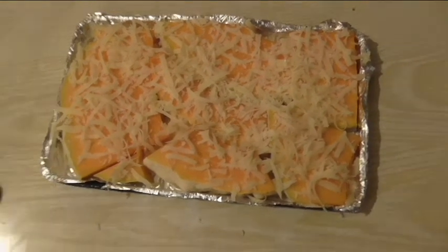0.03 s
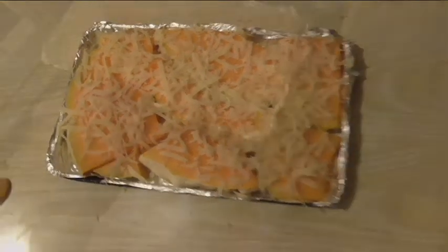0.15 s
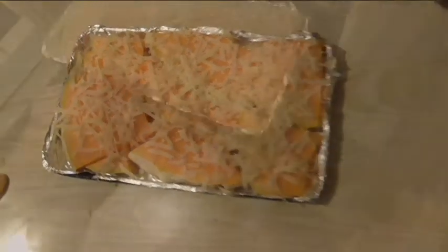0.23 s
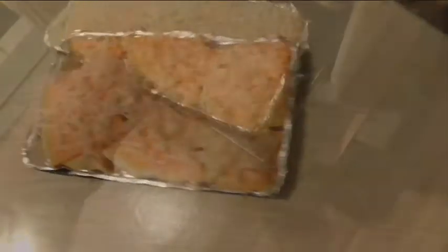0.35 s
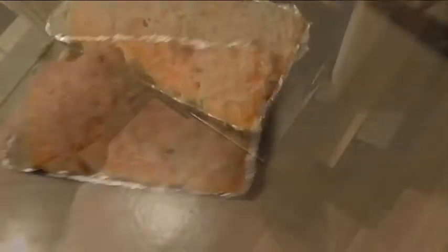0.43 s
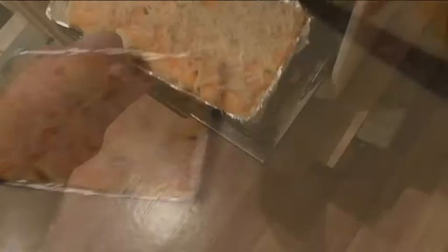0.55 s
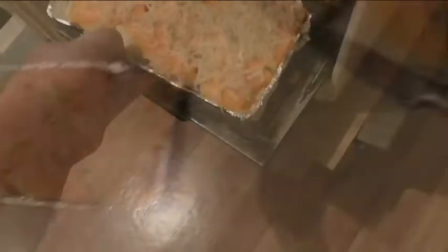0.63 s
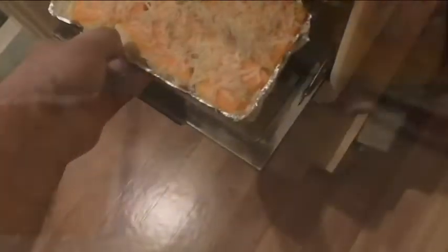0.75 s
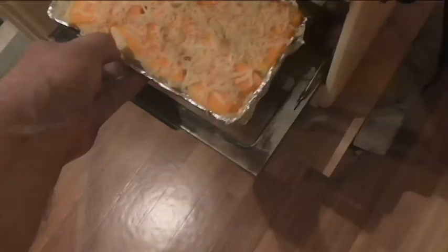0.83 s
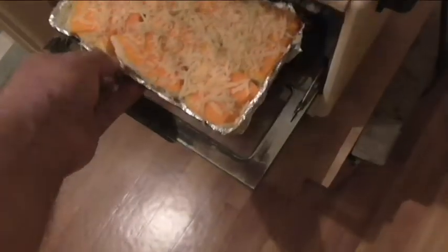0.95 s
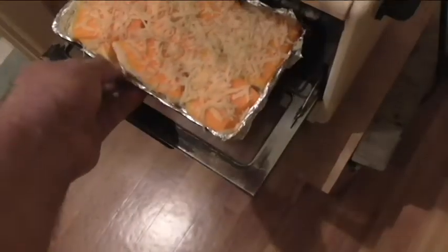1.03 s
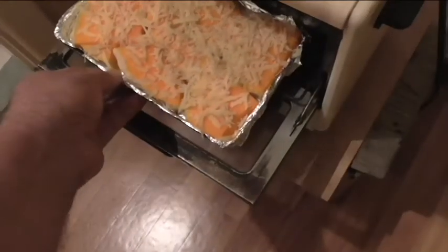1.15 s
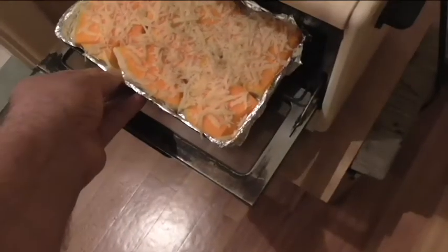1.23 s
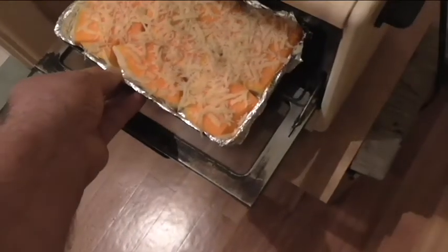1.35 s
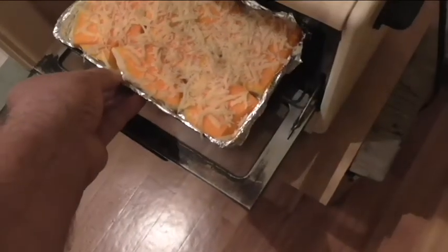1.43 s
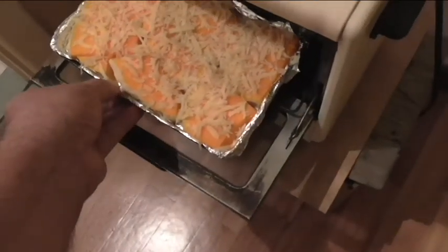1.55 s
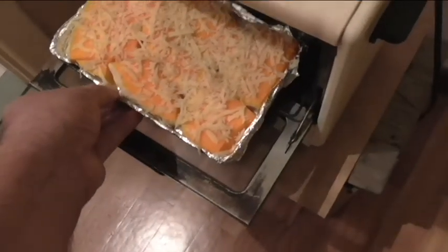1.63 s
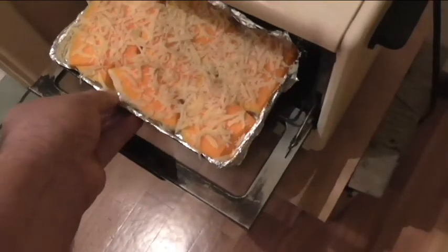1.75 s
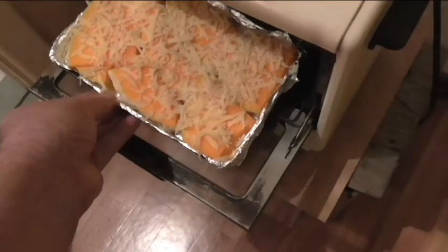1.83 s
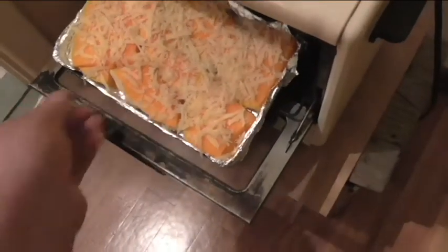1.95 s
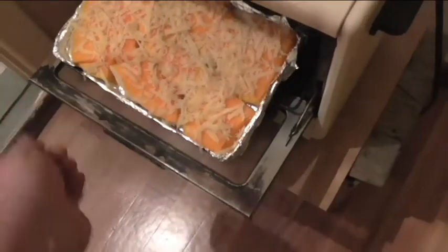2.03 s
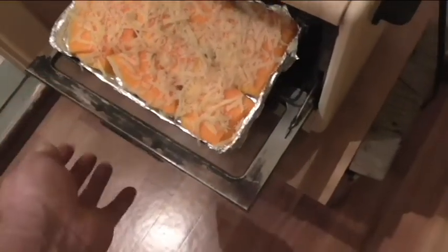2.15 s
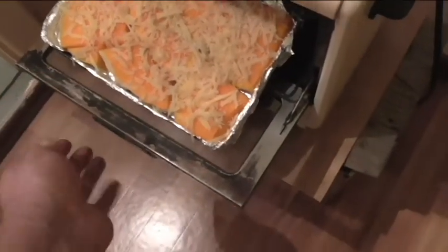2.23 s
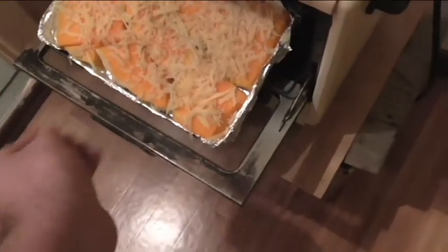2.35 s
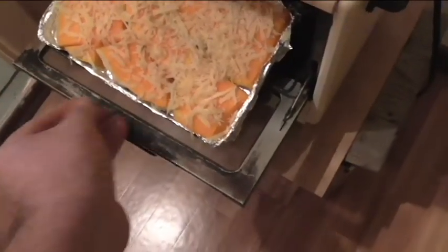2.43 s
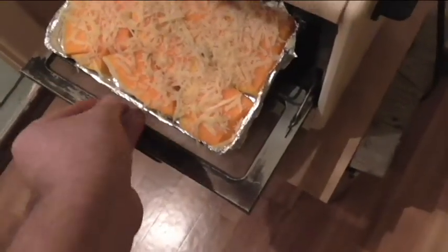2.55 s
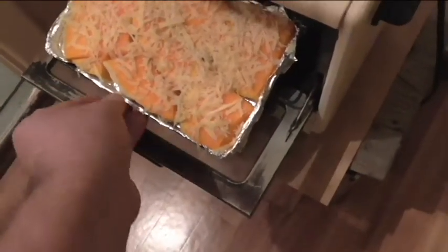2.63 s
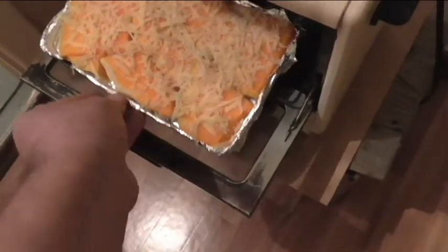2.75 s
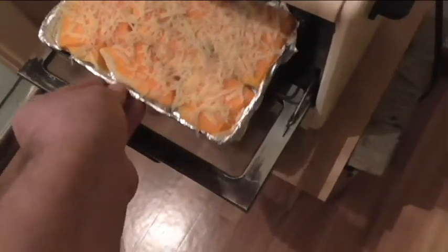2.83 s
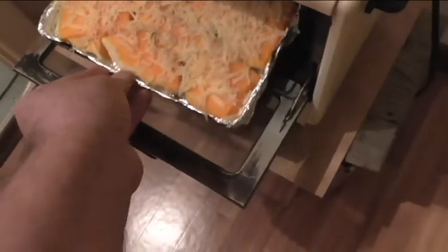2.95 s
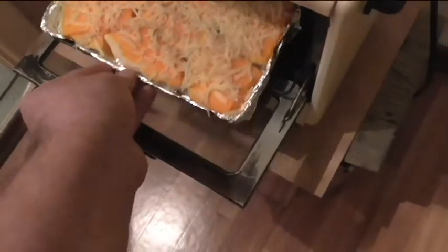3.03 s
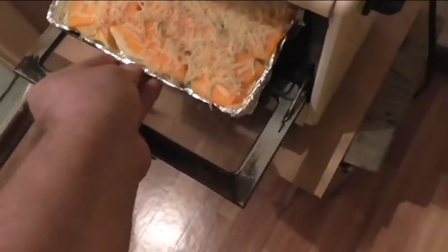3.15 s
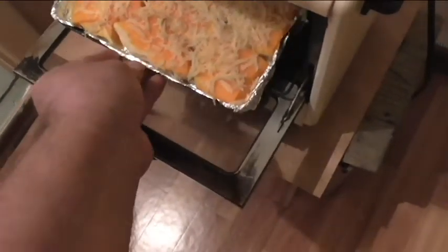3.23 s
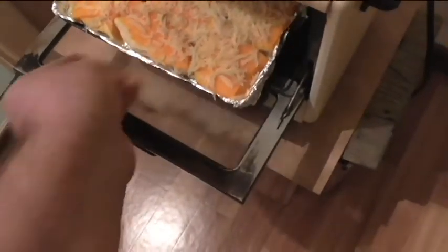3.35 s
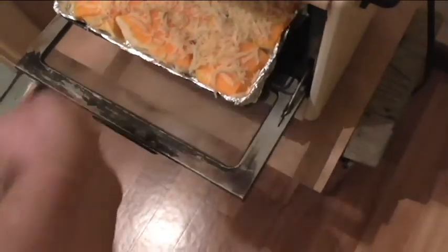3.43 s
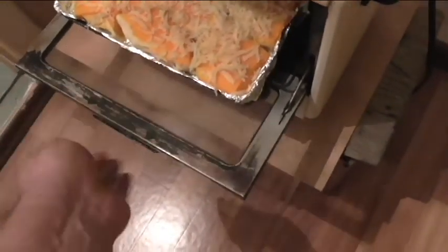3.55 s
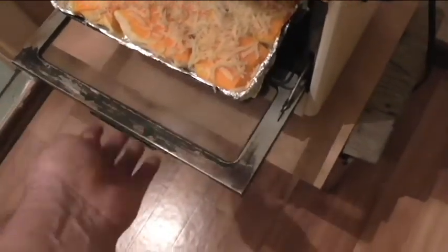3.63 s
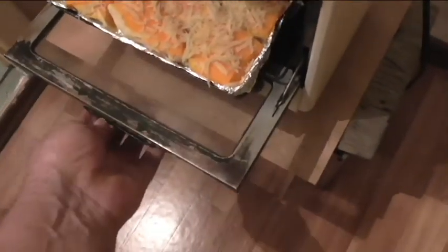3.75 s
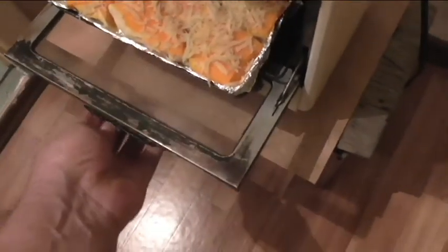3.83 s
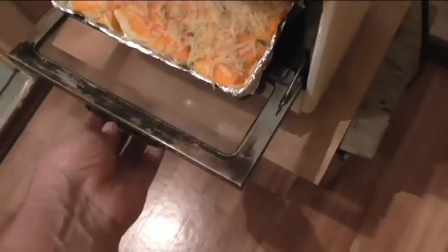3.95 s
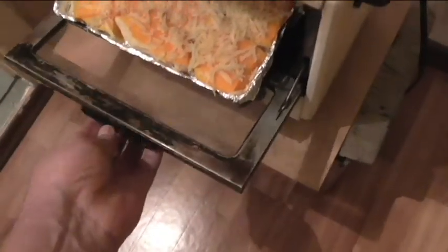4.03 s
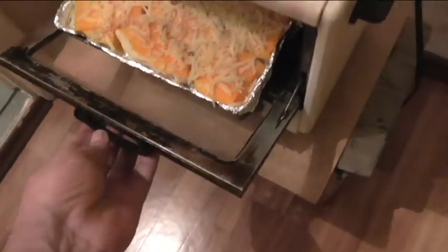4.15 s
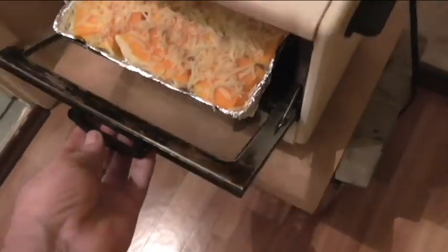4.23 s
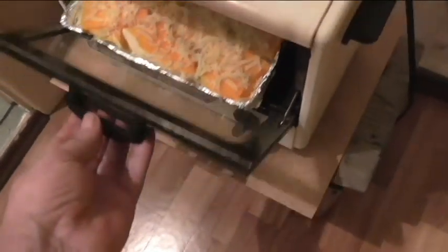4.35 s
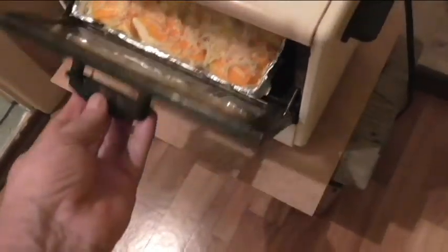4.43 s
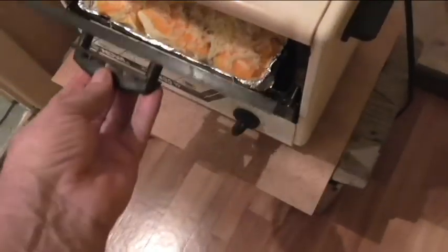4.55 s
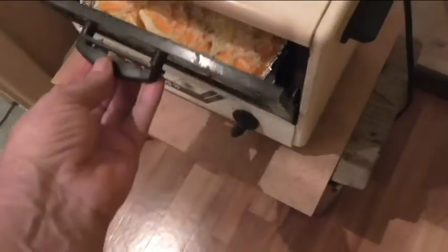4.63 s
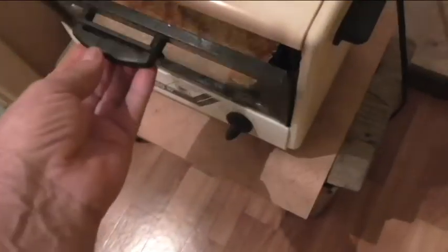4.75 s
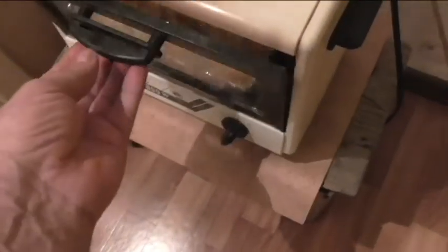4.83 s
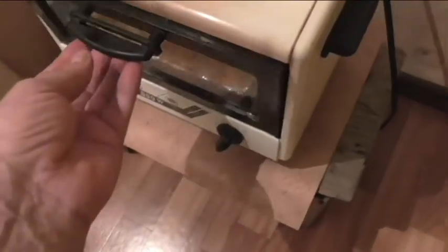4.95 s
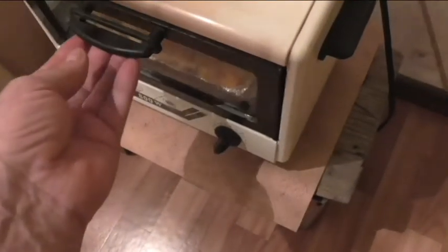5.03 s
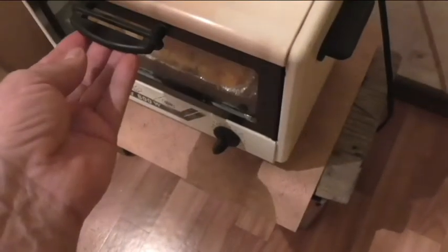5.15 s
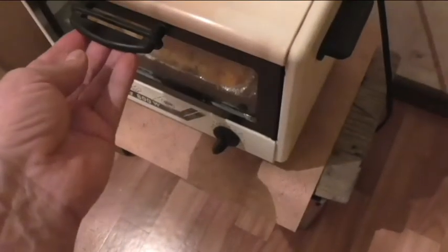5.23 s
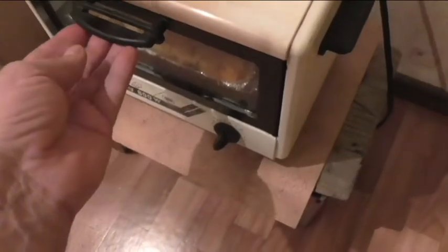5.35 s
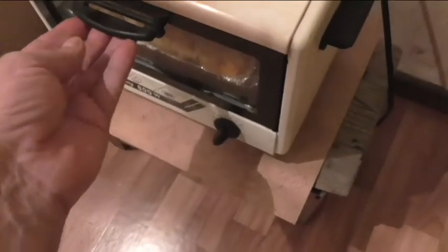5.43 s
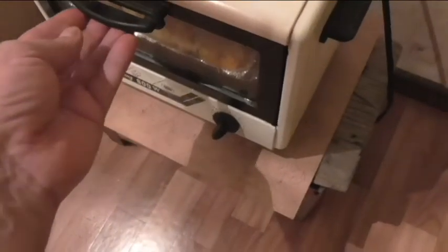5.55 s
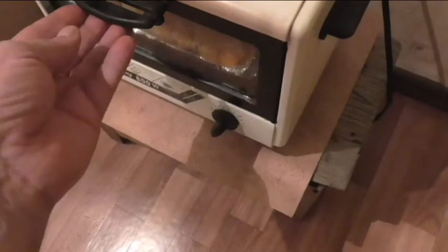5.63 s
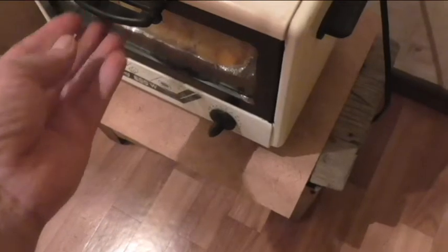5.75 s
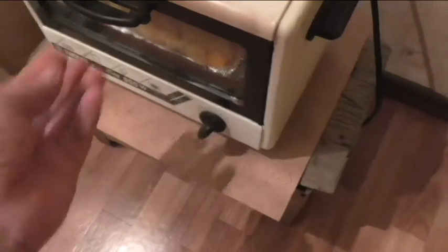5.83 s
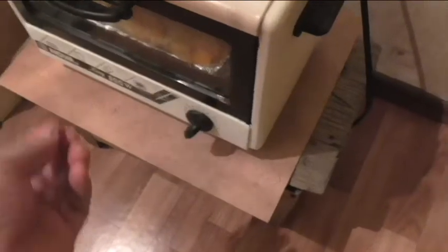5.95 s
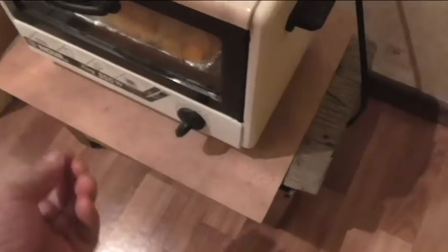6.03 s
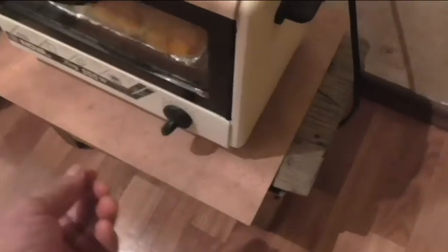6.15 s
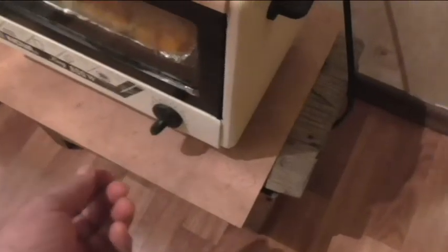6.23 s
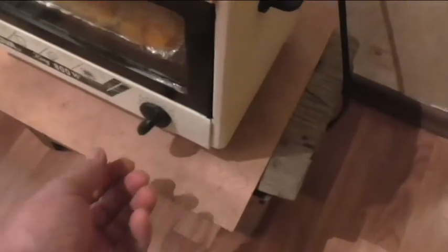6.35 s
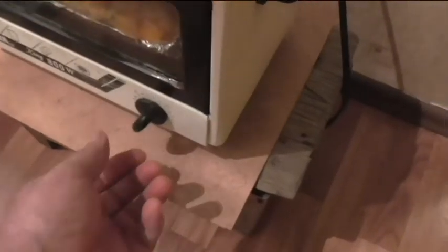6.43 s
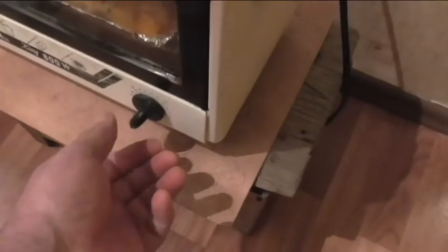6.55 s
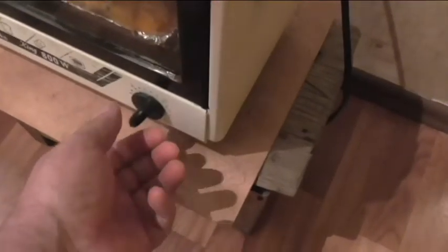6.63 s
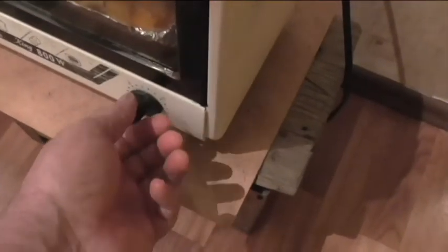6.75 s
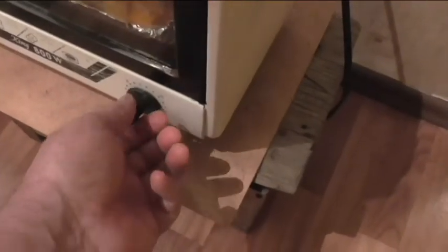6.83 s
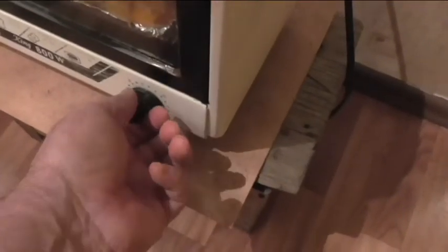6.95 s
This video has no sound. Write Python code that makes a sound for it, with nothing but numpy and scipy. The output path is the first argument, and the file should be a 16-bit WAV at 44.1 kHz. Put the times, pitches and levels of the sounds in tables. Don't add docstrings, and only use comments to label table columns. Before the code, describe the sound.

A small, quiet kitchen with steady soft hush, and low wobble from the hand holding the close microphone. Faint foil crackle opens. At 0.8 s a metal tray knocks the oven ledge with a dull boom and short drag; at 1.15 s a bright blow rings the wire rack, followed by fading scrapes and a small knock at 1.5 s. At 2.35 s the loudest bang clatters tray and cabinet, with rebounds to 2.6 s. Light ticks and foil rustles lead to rough, juddering scraping from 3.2 to 3.65 s. A finger bumps the microphone body at 4.0 s; skin brushes the handle. The hinge squeaks faintly at 4.45 s, the door arm clunks at 4.53 s, and the door slams with a metallic rattle at 4.8 s, rumbling away. Small catch clicks come at 5.8 s, then soft crackling rustles from 6.4 s to about 7 s.

```python
import sys
import numpy as np
from scipy import signal
from scipy.fft import rfft, irfft, next_fast_len
from scipy.io import wavfile
from scipy.ndimage import uniform_filter1d

SR = 44100
rng = np.random.default_rng(int(sys.argv[2]) if len(sys.argv) > 2 else 0)


def wrap_up_sound(samples):
    columns = np.atleast_2d(samples).T
    tamed = np.clip(columns, -1, 1)
    steps = np.round(tamed * 32767).astype(np.int16)
    wavfile.write(sys.argv[1], SR, steps)


N = 308203


def undb(db):
    return 10 ** (np.asarray(db) / 20)


def evened(x):
    return x / np.sqrt(np.mean(x ** 2) + 1e-20)


def read(points, hz):
    f, value = np.transpose(points)
    return np.interp(np.log(hz + 1), np.log(f + 1), value)


def colour(x, points):
    size = next_fast_len(len(x))
    gain = undb(read(points, np.fft.rfftfreq(size, 1 / SR)))
    return irfft(rfft(x, size) * gain, size)[:len(x)]


def ring(x, hz, width_hz):
    r = np.exp(-np.pi * width_hz / SR)
    return 2 * signal.lfilter([1 - r], [1, -r * np.exp(2j * np.pi * hz / SR)], x).real


def add(mix, s, sound):
    part = mix[round(s * SR):][:len(sound)]
    part += sound[:len(part)]


def wander(count, per_s, spread_db):
    knots = np.arange(0, N / SR + 1, 1 / per_s)
    db = spread_db * rng.standard_normal((count, len(knots)))
    return [evened(undb(np.interp(np.arange(N) / SR, knots, row))) for row in db]


def slips(per_s, spread_db, hiss):
    size = undb(spread_db * np.minimum(rng.exponential(1, N), 5))
    size = size * rng.choice([-1., 1.], N)
    clicks = size * (rng.random(N) < per_s / SR)
    return evened(evened(clicks) + hiss * rng.standard_normal(N))


def swells(rows, extra_db=0):
    shape = 1.406
    s, db, rise_s, fall_s = np.transpose(rows)[:4, :, None]
    step = np.arange(0, N + 64, 64)
    late_s = step / SR - s
    far = abs(late_s) / np.where(late_s < 0, rise_s, fall_s)
    gain = undb(db + np.reshape(extra_db, (-1, 1)) - 20 * far ** shape)
    return np.interp(np.arange(N), step, np.linalg.norm(gain, axis=0))


def crack(t, hz, width_hz, t60_s):
    band = ring(ring(rng.standard_normal(len(t)), hz, width_hz), hz, width_hz)
    return evened(band) * undb(-60 * t / t60_s) * (1 - np.exp(-t / .0004))


def struck(t, hz, db, t60_s):
    start = undb(db) * (-1.) ** np.arange(len(hz))[:, None]
    rise = 1 - np.exp(-t * hz / 1.3)
    modes = start * rise * np.sin(2 * np.pi * hz * t) * undb(-60 * t / t60_s)
    return modes.sum(0) / np.linalg.norm(start)


# frequency in Hz, level in dB per Hz.
HUSH = [(15, -25), (55, -21), (152, -30.5), (570, -34.5), (2260, -41), (3900, -36.5), (6100, -37.5),
        (9210, -53), (14100, -105)]
# peak in seconds, level in dB, rise in seconds, fall in seconds.
GRIP = [
    (0.27, -55.5, 2.6, 0.35),
    (1.17, -55.5, 0.3, .12),
    (2.47, -54.5, 0.48, .14),
    (3.27, -60, 1.3, 0.5),
    (3.96, -58.5, 0.41, 0.18),
    (4.2, -66, .2, 2.7),
    (5.45, -59.5, 1.3, 0.33),
    (6.99, -62, 3, 0.45),
]


def kitchen():
    hush_db, grip_rest_db = -59.5, -66
    hush = undb(hush_db) * evened(colour(rng.standard_normal(N), HUSH))
    wobble_band = [(4, 9.5), (12, 3), (30, 15), (60, -31), (100, -43.5)]  # (Hz, dB)
    wobble = evened(colour(rng.standard_normal(N), wobble_band))
    return hush + wobble * np.hypot(undb(grip_rest_db), swells(GRIP))


# peak in seconds, level in dB, rise in seconds, fall in seconds.
CREASES = [(0.0, -57, .05, 0.059), (0.15, -59.5, 1.5, 2.1), (2.19, -78, 0.086, 0.16),
           (2.56, -58, 0.26, 0.11), (2.73, -61.5, 0.034, 0.18), (2.94, -54.5, 0.11, 0.17),
           (3.09, -58, .15, 0.22), (3.2, -64, 0.05, .25), (3.33, -44.5, 0.25, 0.11),
           (3.61, -56, 0.076, 0.09), (3.975, -61, 0.11, 0.059), (4.1, -62, 0.069, 0.63),
           (4.25, -53, 0.21, 0.028), (4.79, -34.5, 0.017, 0.078), (6.33, -62, 0.32, 0.25),
           (6.51, -53, 0.23, 0.25), (6.67, -54.5, 0.22, 1.2), (6.99, -45.5, 0.033, .05)]
# peak in seconds, boom in dB, rise in seconds,
# fall in seconds, clang against boom in dB.
SHUDDERS = [(0.0, -53, .05, 0.0054, 3), (0.877, -31.5, 0.015, 0.035, -11), (1.219, -39.5, 0.036, 0.18, -18),
            (1.312, -51, 0.15, 0.053, 13.5), (2.15, -59.5, 0.063, 0.16, -5), (2.45, -48, 0.02, 0.085, -19),
            (2.58, -45, 0.041, 0.21, 0), (2.88, -54.5, 0.1, 0.31, -27), (3.078, -49.5, 0.098, 0.18, -27),
            (3.72, -52.5, .15, 0.33, -4), (4.11, -52, 0.049, 0.25, -25), (4.6, -37.5, 0.07, 0.2, -21),
            (4.77, -40.5, 0.092, 0.23, 11.5), (4.834, -33, 0.029, 0.22, -7), (5.1, -46.5, 0.21, 0.26, -9),
            (5.446, -53, 0.17, 0.38, -8), (5.855, -55.5, 0.089, 0.25, -10), (5.955, -58, .03, 0.054, -20),
            (6.07, -62.5, 0.32, 0.32, -1.5), (6.36, -64, 0.19, 0.14, -2.5),]
# peak in seconds, drag in dB, rise in seconds, fall in seconds,
# weight passed to the cabinet in dB.
SLIDES = [(0.925, -51, 0.055, 0.31, 8.5), (1.24, -45.5, 0.12, 0.17, 6.5), (1.434, -53, 0.28, 0.32, 10),
          (1.68, -64.5, 0.76, 0.2, 12), (2.301, -57, 0.0088, 0.14, -2.5), (2.46, -61, 0.038, 0.083, -1),
          (2.94, -60, 0.1, 0.12, -19), (3.2, -49, 0.067, 0.53, 6), (3.34, -41, 0.18, 0.25, 5),
          (3.53, -50, 0.14, 0.12, 9.5), (3.62, -46, 0.19, 0.092, 7.5), (3.885, -71, 0.016, 0.15, 3),
          (4.781, -39, 0.18, 0.22, 3.5), (6.7, -69, 0.79, 0.56, 4)]
# peak in seconds, drag in dB, rise in seconds,
# fall in seconds, weight passed to the cabinet in dB.
SWINGS = [
    (4.502, -61.5, 0.27, 0.087, 13.5),
    (4.57, -60, 0.085, 0.059, 17.5),
    (4.8, -42, 0.13, 0.052, -12),
    (5.12, -57, 0.18, 0.43, 3.5),
    (5.5, -62, 0.88, 0.093, -3),
    (6.72, -69, 0.54, 0.41, -13),
]


def efforts():
    rasp_db, boom_db, clang_db = -0.5, -2.5, 0
    drags = SLIDES + SWINGS
    weight = swells(drags, np.transpose(drags)[-1])
    rubbing = swells(SLIDES)
    rasping = np.hypot(undb(rasp_db) * rubbing, swells(CREASES))
    boom = np.hypot(undb(boom_db) * weight, swells(SHUDDERS))
    clang = np.hypot(undb(clang_db) * weight, swells(SHUDDERS, np.transpose(SHUDDERS)[-1]))
    return rasping, rubbing, swings_gain(), boom, clang


def swings_gain():
    return swells(SWINGS)


# frequency in Hz, t60 in seconds, struck level in dB, rubbed level in dB.
CABINET = [(113.2, 0.96, -20, -14), (187, 0.37, -37, -46), (206.9, 0.94, -11, -12.5),
           (247.2, 0.63, -23, -9.5), (277.3, 0.37, -27, -4), (317.1, 0.36, 2, -6), (344.7, 0.5, 3.5, -5),
           (370.8, 0.28, 14.5, -1), (404, 0.47, -6, -16), (433, 0.35, 5, -5.5), (452.6, 0.31, -16, -7.5),
           (539, 0.52, -3.5, -5.5), (599.7, 0.066, 5.5, 8.5), (654.6, 0.28, 3.5, -22),
           (686, 0.092, -29, 4.5), (732, 0.2, 1, -1.5), (850, 0.25, 0, -19), (855, 0.12, -11, 2),
           (968, 0.43, -5.5, -10.5), (1040, 0.46, -19, -27)]
# frequency in Hz, gain in dB.
SHEET = [(80, -5), (105, -1.5), (1050, -4), (1500, -23)]


def rumble(modes, gain):
    drag = colour(slips(900, 4.0, 1.23), SHEET)

    def walls(force):
        return sum(undb(db) * np.sqrt(t60_s) * ring(force, hz, 2.52 / t60_s) for hz, t60_s, _, db in modes)

    return walls(drag * gain) / np.std(walls(drag[:2 * SR]))


# frequency in Hz, width in Hz, level in dB.
WIRES = [(1454, 22, -25), (2470, 96, -15), (1950, 11, -15), (2650, 90, -12.5), (3300, 90, -21),
         (3510, 67, -3), (3730, 71, -8), (4380, 170, -8), (5300, 210, -10), (5700, 300, -22)]


def rack_wires(force):
    touch = wander(len(WIRES), 12.0, 3.5)
    out = np.zeros(N)
    for k, (hz, width_hz, db) in enumerate(sorted(WIRES)):
        out += (-1) ** k * undb(db) * ring(force * touch[k], hz, width_hz)
    return out


def tray_sheet(force):
    t = np.arange(SR // 8) / SR
    echoes = rng.standard_normal((4, len(t))) * undb(-60 * t / 0.14)
    turn = np.pi * (np.arange(N) / SR * 6 + np.arange(4)[:, None] / 4)
    fed = force * np.cos(turn) ** 2 * np.sqrt(2 / 3)
    return signal.oaconvolve(fed, echoes / np.linalg.norm(echoes[0]), axes=1).sum(0)[:N]


# frequency in Hz, level in dB per Hz.
RASP = [(900, -25), (1800, -10.5), (2600, -13.5), (3500, -8.5), (4600, 0), (6100, -2.5), (7100, -11),
        (8200, -22)]
# frequency in Hz, level in dB per Hz.
RUB = [(700, -40), (1000, -15), (1300, -6.5), (1750, -10), (2050, -4), (3300, -7.5), (4200, -7.5),
       (6000, -54)]
# frequency in Hz, level in dB per Hz.
SLOT = [(600, -43), (900, -9), (1300, -2.5), (1700, -1), (2200, -3), (2950, 1.5), (3300, -9), (5000, -32)]


def scrape():
    rasping, rubbing, swinging, boom, clang = efforts()
    grip = uniform_filter1d(uniform_filter1d(rng.standard_normal(N), 500), 500)
    catching = undb(1.33 * evened(grip))
    rasp = evened(colour(slips(2600, 3.0, 0.5), RASP) * catching) * rasping
    rub = evened(colour(slips(2600, 2.6, 0.5), RUB) * catching) * rubbing
    rub = rub + evened(colour(slips(1500, 0.86, 0.81), SLOT)) * swinging
    on_rack = rub + rasp * np.minimum(rubbing / rasping, 1)
    walls = rumble(CABINET[:11], boom) + rumble(CABINET[11:], clang * catching)
    direct = rasp + rub
    return 0.72 * direct + 1.03 * tray_sheet(direct) + 1.47 * rack_wires(on_rack) + colour(walls, SHEET)


# start in seconds, level in dB, t60 in seconds.
RUSTLES = [(0.807, -39.5, 0.15), (0.925, -58, 0.18), (2.179, -38.5, 0.3), (2.87, -41.5, 0.23),
           (3.1, -39, 0.11), (3.876, -39.5, 0.28), (6.369, -40.5, 0.29), (6.509, -40.5, 0.39),
           (6.645, -35, 0.43), (6.7688, -33, 0.18), (6.974, -43, 0.19)]


def rustle(s, rustle_db, t60_s):
    t = np.arange(SR // 3) / SR
    foil = evened(colour(rng.standard_normal(len(t)), RASP))
    return s, undb(rustle_db - 10.0 - 60 * t / t60_s) * foil * (1 - np.exp(-t / 0.0014))


# frequency in Hz, level in dB, t60 in seconds.
LEDGE = [(249.4, -1.5, 0.49), (358.7, 5.5, 0.29), (442, -6, 0.53), (565, -5, 0.22), (655, -2, 0.59),
         (702, 0, 0.13), (958, -6, 0.28)]
RIM = [(913, -4, 0.099), (1940, -1, 0.21), (2070, -9, 0.088), (2530, 0, 0.08), (2750, 1, .07),
       (3810, -12, .08), (4400, -3, 0.064), (4732, -0.5, .06)]
CLIP = [(1937, 1, 0.16), (2400, -10, .08), (5150, -1, 0.097), (5330, -6, .07), (3100, -14, 0.045)]
RACK = [(121, -18, 2.22), (207.6, -12.5, 1.24), (278, -8.5, 0.5), (564, -6.5, 1.26), (840, -18, 0.22),
        (1020, -10, 0.41), (1910, -6, 0.26), (2810, 3, 0.15), (3060, 9.5, 0.047), (3300, 3.5, 0.093),
        (5200, 1.5, 0.17), (5830, 16, 0.023), (4130, -31, 0.033), (10100, -7.5, 0.023)]
TRAY = [(190, -14.5, 1), (1185, -8, 0.15), (2100, 4, 0.045), (690, -5.5, 0.14), (810, 4.5, 0.081),
        (1440, 10, 0.043), (1900, -4, 0.26), (1610, -7, 0.17), (2480, -1, 0.049), (2820, 16, 0.036),
        (3700, 5, 0.035), (4270, -12, 0.11), (4517, 2, 0.079), (5700, 3, 0.034)]
BELLY = [(375, 0, 0.24), (322, -5, 0.68), (244, -15.5, .5), (436, -3, 0.062), (210, -19.5, 0.94),
         (646, -9.5, 0.26), (477, -7.5, .2), (749, -10, 0.15), (946, -11, 0.19), (561, -8.5, 0.17),
         (411, -11, .15), (518, -15, 0.14), (348, -13, 0.22)]
LIP = [(1420, -3, 0.044), (2800, 0, 0.03), (4500, 0, 0.026)]
THUD = [(215, 1, .06), (348, 1, 0.079), (3300, -12, .02)]
ARM = [(357.6, 12, 0.13), (448, -1.5, 0.14), (600, 9, 0.03), (774, 4.5, 0.045), (950, -6, 0.061),
       (1560, -1, 0.079), (1250, -8, 0.054), (1900, -13, 0.052), (3010, -6.5, 0.035), (3450, -8, .03)]
STOP = [(314, 13, 0.039), (386, -16, 0.03)]
DOOR = [(113.3, -15.5, 1.4), (383, 9, 0.56), (375, -2, 1.65), (721, -11, .08), (950, -15, .1),
        (1900, 8, 0.074), (3000, -11, 0.11), (3600, 5, 0.12), (4050, -11, .04), (4600, -7, 0.041),
        (5570, -12, .1)]
CATCH = [(271, 7, 0.062), (375, -7, 0.22), (2900, -2.5, 0.02), (4380, 1.5, 0.024)]
BOUNCE = [(213, -2, 0.29), (258, -28, 0.24), (316, 9, 0.2), (370.4, 11, 0.38), (477, -12, 0.08),
          (590, -18, 0.09), (686, -19, 0.14), (2870, -19, .05)]
HARD_S, PADDED_S = 0.00016, 0.0068
# start in seconds, level in dB, contact rise in seconds, modes of the part.
STRIKES = [(0.828, -28.5, PADDED_S, LEDGE), (0.8331, -33, HARD_S, RIM), (0.839, -39, HARD_S, RIM),
           (0.8438, -32.5, HARD_S, RIM), (0.853, -39, HARD_S, RIM), (0.928, -42, HARD_S, CLIP),
           (0.965, -41.5, HARD_S, CLIP), (1.1572, -13, HARD_S, RACK), (1.172, -31, PADDED_S, LEDGE),
           (2.337, -9.5, HARD_S, TRAY), (2.3361, -16.5, HARD_S, BELLY), (2.384, -26, HARD_S, BELLY),
           (2.456, -26.5, HARD_S, BELLY), (2.564, -26.5, HARD_S, BELLY), (2.564, -35, HARD_S, LIP),
           (2.896, -37, HARD_S, THUD), (3.062, -46, HARD_S, THUD), (4.527, -17.5, HARD_S, ARM),
           (4.536, -33, HARD_S, ARM), (4.549, -20, HARD_S, STOP), (4.58, -19.5, HARD_S, STOP),
           (4.786, -25.5, HARD_S, DOOR), (5.7836, -32.5, HARD_S, CATCH), (5.812, -39, HARD_S, CATCH),
           (5.946, -44.5, PADDED_S, BOUNCE)]


def blow(s, level_db, rise_s, modes):
    hz, db, t60_s = np.transpose(modes)[:, :, None]
    t = np.arange(0, min(t60_s.max(), 1), 1 / SR)
    return s, undb(level_db) * struck(t, hz, db, t60_s) * (1 - np.exp(-t / rise_s))


def cabinet(t, length):
    hz, t60_s, db, _ = np.transpose(CABINET)[:, :, None]
    place_db = 5 * (rng.random(hz.shape) - .5)
    return struck(t, hz, db + place_db, length * t60_s)


# frequency in Hz, level in dB per Hz.
CLATTER = [(350, -23.5), (850, 0), (1100, 0), (1500, 0), (2000, -3.5), (4500, -2.5), (5750, -6.5),
           (7200, -24), (10900, -39.5), (14000, -70)]
# frequency in Hz, t60 in seconds.
CLATTER_T60 = [(1000, 0.86), (2000, 0.61), (4000, 0.47), (6000, 0.41), (10000, 0.41)]
# start in seconds, clatter in dB, cabinet in dB, crack pitch in Hz, crack in dB.
FREE_KNOCKS = [(0.8296, -26, -36, 2460, -14), (1.1574, -20, -31.5, 3180, -4), (1.165, -27, -60, 3300, 7),
               (1.186, -30, -40, 3300, 4.5), (1.5035, -41.5, -52, 5730, -4), (2.4577, -34.5, -32, 1880, -2),
               (3.1524, -44, -52, 4400, 0), (3.245, -46, -39, 2470, 9.5), (3.52, -29, -30.5, 2530, -5.5),
               (3.6057, -49, -32.5, 5700, 12), (4.0741, -51, -47.5, 3260, -2),
               (4.786, -19.5, -26.5, 4250, 1), (4.7979, -30.5, -26, 3700, 10)]
# start in seconds, clatter in dB, cabinet in dB,
# crack pitch in Hz, crack in dB.
DAMPED_KNOCKS = [
    (2.337, -13, -38, 2190, -5),
    (2.381, -29, -37, 1870, -11),
    (2.565, -36.5, -32, 2800, -12.5),
    (2.724, -43.5, -41.5, 1610, -10),
    (4.5281, -30.5, -32, 1350, -4.5),
]
FREE_RING, DAMPED_RING = 1, 0.61


def knock(s, clatter_db, cabinet_db, crack_hz, crack_db, length):
    t = np.arange(SR * 3 // 5) / SR
    hz, when_s, z = signal.stft(rng.standard_normal(len(t)), SR, nperseg=256)
    hollow_db = -5.5 * np.exp(-(np.log((hz + 1) / (0.47 * crack_hz)) / .22) ** 2)
    level_db = (read(CLATTER, hz) + hollow_db)[:, None]
    decay_db = 60 * when_s / (length * read(CLATTER_T60, hz)[:, None])
    clatter = signal.istft(z * undb(level_db - decay_db), SR, nperseg=256)[1][:len(t)]
    clatter = clatter / np.std(clatter[:400]) * (1 - np.exp(-t / .003))
    treble = 0.24 * clatter + undb(crack_db) * crack(t, crack_hz, 1750, 0.049)
    return s, undb(clatter_db) * treble + undb(cabinet_db) * cabinet(t, length)


# start in seconds, level in dB, cabinet in dB, pitch in Hz.
TICKS = [(2.8695, -43, -46, 3600), (2.8966, -42.5, -45, 3320), (2.938, -43, -43, 4500),
         (2.952, -44, -44, 5500), (2.991, -45, -50, 5570), (3.013, -50, -58, 3480),
         (3.066, -45.5, -41.5, 3300), (3.286, -31.5, -35, 3600), (3.329, -28, -32, 3430),
         (3.3338, -31, -39, 3600), (3.3687, -34, -34, 2650), (3.381, -32.5, -26.5, 5280),
         (3.388, -42, -44, 4250), (3.405, -36, -41, 5660), (3.413, -32.5, -48, 5300),
         (3.562, -36, -43, 5550), (3.5987, -34, -59, 5040), (3.876, -50, -58, 5000),
         (2.179, -48, -52, 5050), (6.368, -43.5, -63, 5200), (4.6425, -49, -52, 2410),
         (4.693, -47, -53, 2400), (4.726, -34, -54, 3220), (4.786, -30, -43, 2170),
         (4.8326, -27.5, -46, 3300), (4.893, -38, -51, 2900), (4.671, -40, -59, 5520),
         (5.522, -65, -73, 2760), (5.746, -56, -83, 4620), (5.774, -57, -60, 1510),
         (5.8108, -48, -64, 1500), (5.7714, -48, -38.5, 4500), (5.7836, -47.5, -57, 5440),
         (5.784, -54, -64, 1900), (5.8114, -54, -41, 3180), (5.811, -52.5, -58, 5900)]


def tick(s, tick_db, cabinet_db, hz):
    t60_s = 0.042
    t = np.arange(SR // 3) / SR
    wire = 0.06 * np.sin(2 * np.pi * hz * t) * undb(-60 * t / (1.6 * t60_s))
    click = crack(t, hz, 2160, t60_s) + wire
    return s, undb(tick_db) * click + undb(cabinet_db) * cabinet(t, 0.35)


def bump():
    bump_s, bump_db, tick_hz, tick_db = 4.0205, -25, 5040, -23
    t, out = np.arange(SR // 4) / SR, np.zeros(N)
    push = -(1 - np.exp(-t / 0.00062)) * np.exp(-(t / 0.0042) ** 2)
    rebound = 0.16 * (t / 0.018) ** 2 * np.exp(2 - 2 * t / 0.016)
    shell = 0.39 * np.sin(2 * np.pi * 680 * t) * (t / 0.0018) * np.exp(1 - t / 0.0016)
    shell = shell + 0.13 * np.sin(2 * np.pi * 900 * t) * (t / 0.0031) * np.exp(1 - t / 0.003) / 2
    add(out, bump_s, undb(bump_db) * (push + rebound + shell))
    swell = (t / 0.0017) ** 2 * np.exp(2 - 2 * t / 0.0014)
    plastic = np.sin(2 * np.pi * tick_hz * t) + .5 * crack(t, 1200, 6400, 0.019)
    add(out, bump_s - .0016, undb(tick_db) * swell * plastic)
    return out


# peak in seconds, level in dB, rise in seconds, fall in seconds.
STROKES = [
    (4.085, -55.5, .015, 0.11),
    (4.165, -59, 0.063, .1),
    (4.235, -57, 0.045, 0.099),
    (5.93, -74, .04, .1),
]
# frequency in Hz, width in Hz, level in dB.
HANDLE = [(3300, 380, 0.5), (3840, 430, -3), (4500, 250, -8), (5660, 250, 1)]


def handle():
    skin = slips(1500, 1.5, 1.0)
    hiss = np.zeros(N)
    for k, (hz, width_hz, db) in enumerate(HANDLE):
        hiss += (-1) ** k * undb(db) * ring(ring(skin, hz, width_hz), hz, width_hz)
    return evened(hiss) * swells(STROKES)


# time in seconds, pitch in Hz, level in dB.
SQUEAK = [
    (4.446, 1210, -54),
    (4.462, 1200, -52),
    (4.475, 1250, -51),
    (4.487, 1290, -68),
]


def hinge():
    s, hz, db = np.transpose(SQUEAK)
    t = np.arange(s[0], s[-1], 1 / SR)
    waver = 1 + 0.037 * evened(uniform_filter1d(rng.standard_normal(len(t)), size=120))
    phase = 2 * np.pi * np.cumsum(np.interp(t, s, hz) * waver) / SR
    return s[0], undb(np.interp(t, s, db)) * np.sin(phase)


def scene():
    oven = scrape()
    knocks = [(*row, FREE_RING) for row in FREE_KNOCKS] + [(*row, DAMPED_RING) for row in DAMPED_KNOCKS]
    for sound, table in ((rustle, RUSTLES), (blow, STRIKES), (knock, knocks), (tick, TICKS)):
        for row in table:
            add(oven, *sound(*row))
    add(oven, 0, handle())
    add(oven, *hinge())
    return (oven + bump() + kitchen())[None]


def band_limit(x):
    return signal.sosfilt(signal.butter(12, 11010, fs=SR, output="sos"), x)


# frequency in Hz, gain in dB.
EDGE = [(20, 3.5), (10400, -5.5), (10900, -19.5), (11300, -65), (14000, -40), (15600, -30)]


def record(dry):
    offset = .0099
    mix = colour(dry[0], EDGE)[None] + offset
    return band_limit(mix)


dry = scene()
out = record(dry)
wrap_up_sound(out)
```